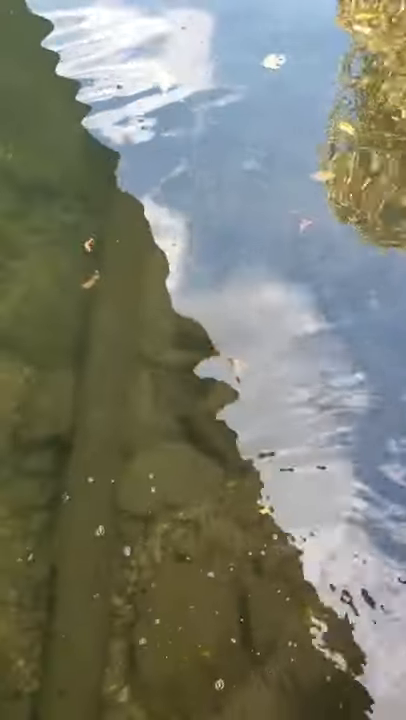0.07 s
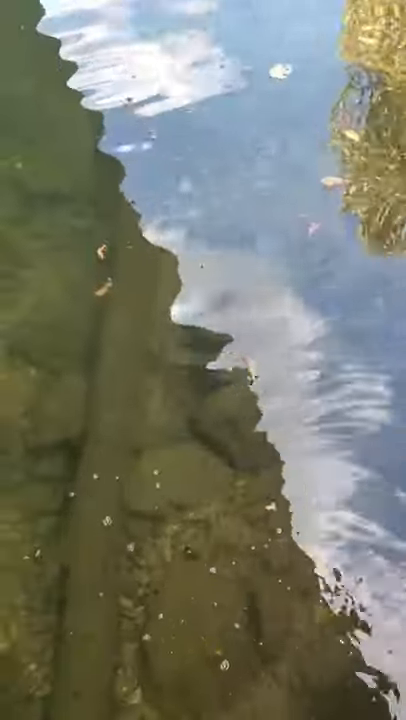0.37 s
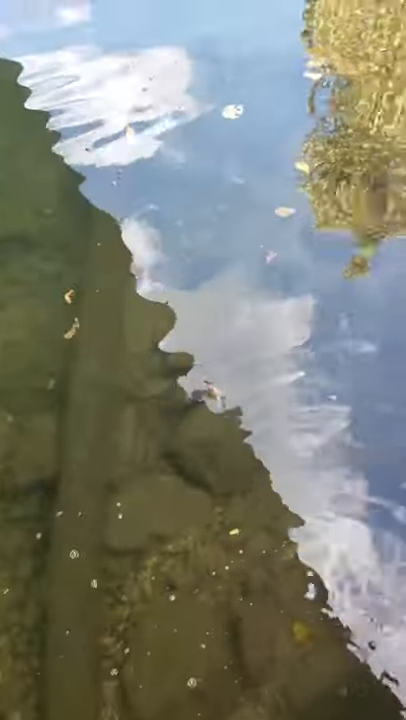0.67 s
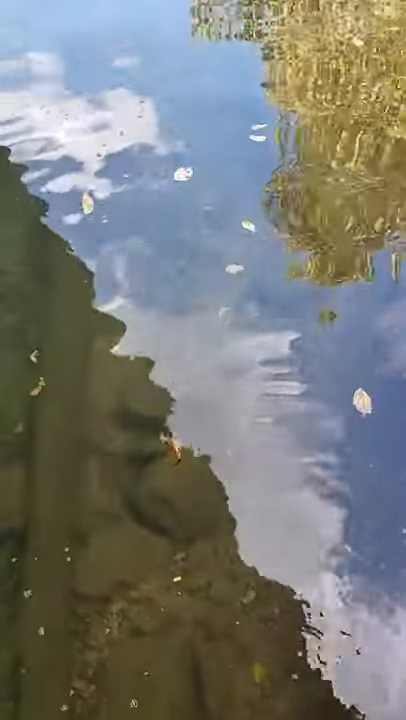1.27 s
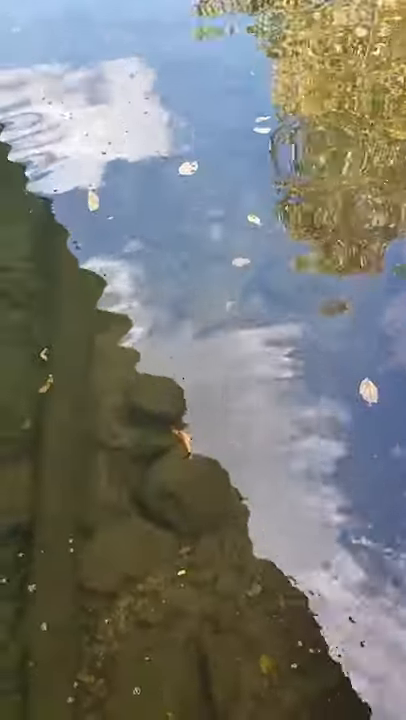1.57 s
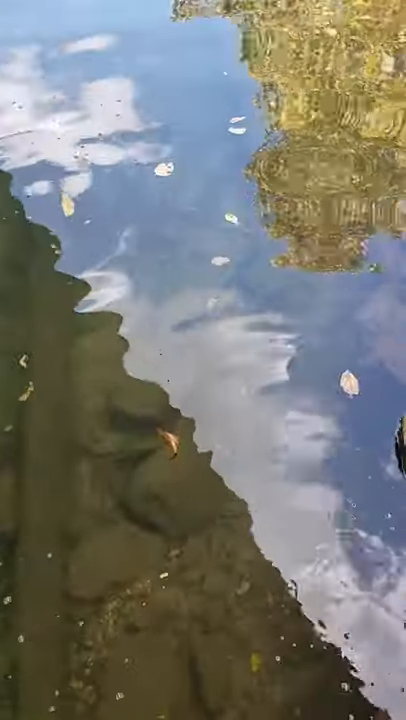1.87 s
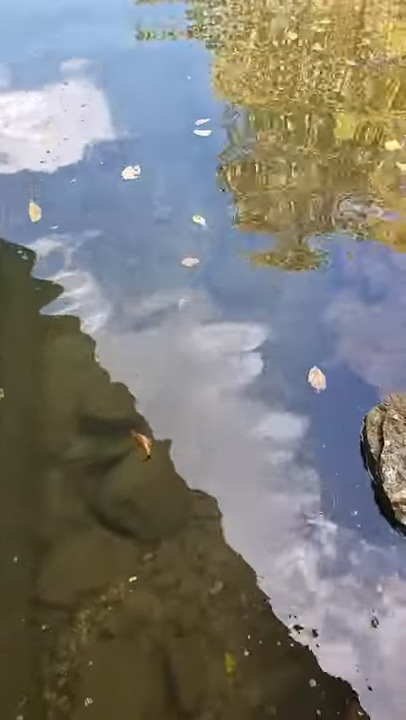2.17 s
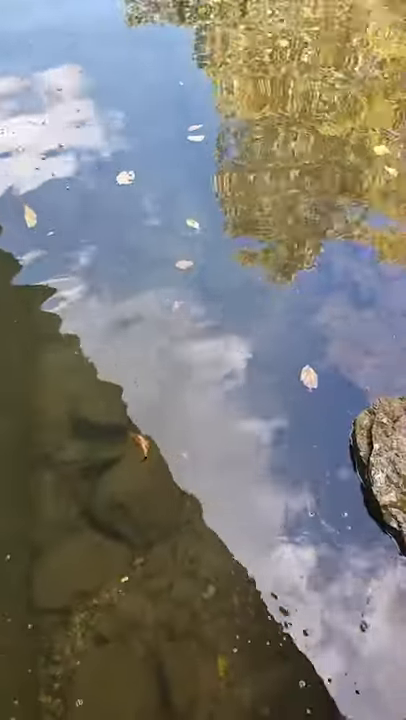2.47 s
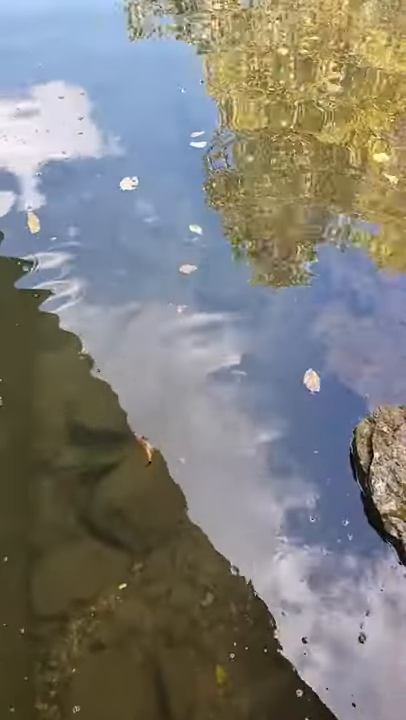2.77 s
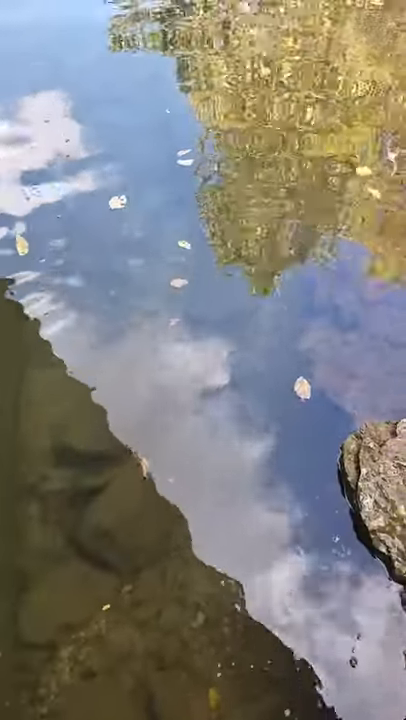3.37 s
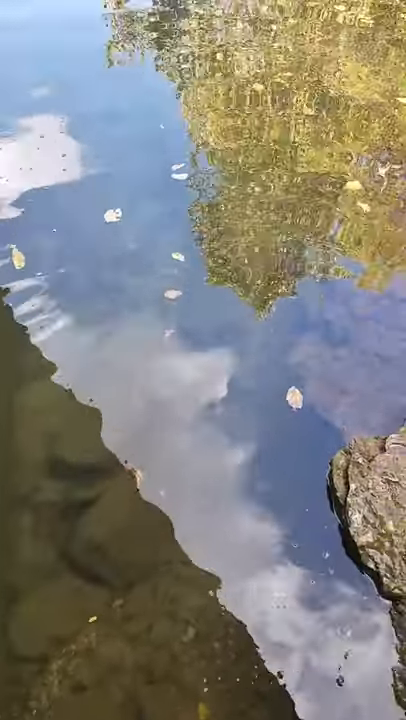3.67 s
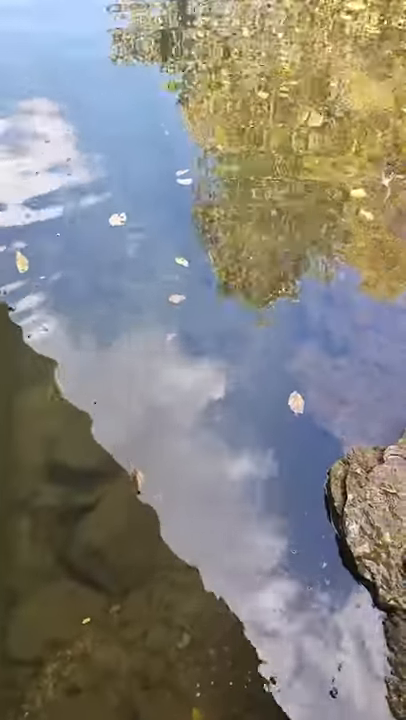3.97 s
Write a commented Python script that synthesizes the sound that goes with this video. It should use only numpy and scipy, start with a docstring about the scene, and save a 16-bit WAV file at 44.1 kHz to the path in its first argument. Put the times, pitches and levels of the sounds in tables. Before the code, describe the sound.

A slow river's low rumble and soft rush, with high insect buzzes and tiny drips.

```python
"""On the bank of a slow river, a warm day, stereo microphone. From the start a low, droning rumble,
like far traffic, lies under a soft rush. Close by on the left, meadow katydids scrape their wings, very
high: a few ticks, then a buzz. A faint cricket pulses below their pitch. In the first second a few tiny
drops plip on the water. The rush swells towards three seconds and ebbs; one more drop falls, and the
rumble sinks under the last ticks."""
import sys
import numpy as np
from scipy import signal
from scipy.fft import rfft, irfft
from scipy.io import wavfile
from scipy.ndimage import uniform_filter1d

SR = 44100
rng = np.random.default_rng(int(sys.argv[2]) if len(sys.argv) > 2 else 0)


def put_to_file(sound):
    """Save the sound as 16-bit audio at rate SR, in the file named by the first command-line argument."""
    columns = np.atleast_2d(sound).T  # one column per channel
    safe = np.clip(columns, -1, 1)
    whole_steps = np.round(safe * 32767)
    wavfile.write(sys.argv[1], SR, whole_steps.astype(np.int16))


N = 176400

# rasp of a katydid's wings, near or far (frequency [Hz], level [dB])
WING_SPECTRUM = [(6500, -64), (8400, -23.5), (9200, -13.5), (10200, -8), (11000, -3), (11700, 1),
                 (12600, -1), (13300, 0), (14000, 1.5), (14800, 0), (15800, -3)]
RUMBLE_PAN_DB, RUMBLE_SPREAD = -2, .11  # narrow, a little to the right


def undb(db):
    """Decibels to gain."""
    return 10 ** (np.asarray(db) / 20)


def unit(x):
    """Scale to rms 1."""
    return x / np.sqrt(np.mean(x ** 2))


def pan(db):
    """Left and right gains, the left louder by db."""
    return undb(np.array([[db], [-db]]) / 2)


def curve(points, t):
    """Gain along (time [s], level [dB]) points."""
    return undb(np.interp(t, *np.array(points).T))


def noise(response, spread=1):
    """Stereo noise of rms 1, shaped by a frequency response; spread 0 is centred, 1 is all around."""
    freqs = np.arange(N // 2 + 1) * SR / N + 1e-6
    mid, side = irfft(rfft(rng.standard_normal((2, N))) * response(freqs), N)
    return unit(mid + spread * side * np.array([[1], [-1]]))


def colour(points):
    """Response through (frequency [Hz], level [dB]) points."""
    hz, db = np.array(points).T
    return lambda f: undb(np.interp(np.log(f), np.log(hz), db))


def resonance(hz, width_hz):
    """Response of a steep resonance."""
    return lambda f: 1 / (1 + ((f - hz) / width_hz * hz / f * (f + hz) / (2 * hz)) ** 2)


def walk(per_s):
    """Smooth random wander of rms 1, with per_s new values a second."""
    hold = int(SR / per_s)
    steps = np.repeat(rng.standard_normal(N // hold + 1), hold)
    return unit(uniform_filter1d(uniform_filter1d(steps, hold), hold)[:N])


def steady(x, window_s=.16):
    """Even out the slow swells of a stereo noise and keep its fast flutter."""
    return x / np.sqrt(uniform_filter1d(np.mean(x ** 2, axis=0), int(window_s * SR)))


def rumble(t, surge_s=.045, dip_s=.035):
    """Far off: a dull roar whose narrow drones grow or fade, with a few low surges and brief dips."""
    # the roar (frequency [Hz], level [dB])
    spectrum = [(12, -7), (29, -42), (46, -8), (62, -17.5), (85, -6.5), (148, -8), (180, 0), (250, 0),
                (290, -9), (335, -6.5), (450, -15.5), (700, -25.5), (1400, -43.5), (3000, -64.5)]
    # its rise and fall (time [s], level [dB])
    levels = [(0, -28), (.25, -26.5), (.55, -25.5), (.75, -27), (1.1, -26), (1.4, -27), (1.65, -26.5),
              (1.92, -29.5), (2.1, -27.5), (2.4, -27), (2.7, -27.5), (3, -28.5), (3.25, -29), (3.6, -28.5),
              (4, -33.5)]
    # drones in it (pitch [Hz], width [Hz], starting level against the roar [dB], drift [dB/s])
    drones = [(102.3, 7.1, -9.5, 0.08), (134.5, 2.5, -11.5, -0.47), (165.8, 11, -8.5, 0.5),
              (211.3, 8.6, -15, 2.5), (238.7, 7.1, -5.5, -4), (362.4, 11.7, -15, 1.68),
              (525.4, 31, -22.5, 2.5), (763, 41, -24.5, 1.5), (1348, 51, -43, 4)]
    # low surges (time [s], level [dB])
    surges = [(.30, -29), (.53, -33), (1.03, -31.5), (1.26, -31), (1.86, -29), (2.08, -36)]
    # brief dips of the roar (time [s], level change [dB])
    dips = [(.43, -3.5), (2.185, -3.5), (3.62, -2.5)]
    roar = noise(colour(spectrum), RUMBLE_SPREAD)
    for hz, width_hz, db, drift in drones:
        roar += undb(db + drift * t) * noise(resonance(hz, width_hz), RUMBLE_SPREAD)
    surge = sum(undb(db) * np.exp(-((t - at) / surge_s) ** 2) for at, db in surges)
    low_band = steady(noise(resonance(hz=100, width_hz=14), RUMBLE_SPREAD))
    dip_db = sum(db * np.exp(-((t - at) / dip_s) ** 2) for at, db in dips)
    return (steady(roar) * curve(levels, t) * undb(dip_db) + surge * low_band) * pan(RUMBLE_PAN_DB)


def rush(t):
    """All around: a soft rush that wavers a little as it swells and ebbs."""
    # the rush (frequency [Hz], level [dB])
    spectrum = [(60, -27), (200, 2), (400, -2), (550, -1.5), (800, -2.5), (1050, -6.5), (1500, -17.5),
                (2000, -25.5), (2650, -33.5), (3300, -37.5), (4500, -47.5), (6200, -60), (9000, -66),
                (16000, -45)]
    # its swell (time [s], level [dB])
    levels = [(0, -39), (.7, -39), (1.5, -38), (2.2, -35), (2.9, -34.5), (3.5, -36), (4, -40)]
    swell = noise(colour(spectrum), spread=.88) * curve(levels, t)
    return swell * undb(.5 * walk(per_s=9.63)) * pan(-3)


def water_hiss():
    """To the right: the fine, steady hiss of the river."""
    # moving water (frequency [Hz], level [dB])
    spectrum = [(500, -28), (1400, 3.5), (2000, 0.5), (2650, -5), (3300, -16.5), (4600, -18), (6300, -27.5),
                (16000, -37)]
    return noise(colour(spectrum)) * undb(-52.5) * pan(-4.5)


def open_air():
    """To the left: the faint, high hiss of the open air."""
    # the air (frequency [Hz], level [dB])
    spectrum = [(2000, 3), (3900, 3.5), (6300, -7), (16000, -4)]
    return noise(colour(spectrum)) * undb(-64) * pan(6.5)


def deep_bass(t):
    """Under the rumble: a deep band that sinks midway and comes back stronger."""
    # its fall and rise (time [s], level [dB])
    levels = [(0, -45), (1.7, -45), (2.2, -54), (3, -50), (4, -40)]
    band = noise(resonance(hz=47.6, width_hz=21), RUMBLE_SPREAD)
    return band * curve(levels, t) * pan(RUMBLE_PAN_DB)


def wing_strokes(cycles, floor, width_cycles=.19, scatter_db=.8):
    """Envelope of a katydid's wing strokes: one scrape a cycle, each of its own strength."""
    nearest = np.round(cycles)
    strength = undb(scatter_db * rng.standard_normal(512))[nearest.astype(int) % 512]
    scrape = np.exp(-.5 * ((cycles - nearest) / width_cycles) ** 2)
    return unit(floor + strength * scrape)


def wing_rasp(hz, lift_db=3, width_hz=1400):
    """Rasp of one katydid's wings, lifted around its own pitch."""
    rasp = colour(WING_SPECTRUM)
    return noise(lambda f: rasp(f) * undb(lift_db * np.exp(-((f - hz) / width_hz) ** 2)))


def katydid_buzzes(t, rise_s=.22, edge_s=.06):
    """Close on the left: fast wing strokes swell into a buzz that stops short."""
    # buzzes (start [s], length [s], stroke rate [Hz], level [dB], left over right [dB],
    # rasp between strokes [0-1], pitch [Hz])
    buzzes = [(-.153, 0.484, 60.5, -44.5, 6.5, 0.6, 13200), (0.695, 0.71, 59.7, -42.5, 8, 0.46, 15100),
              (1.182, 0.4, 59.5, -45, 5, 0.5, 11900), (2.253, 0.46, 59.2, -42.5, 8.5, 0.6, 13700),
              (2.085, 0.686, 61, -44.5, 7.5, 0.6, 14000), (3.206, 0.5, 60, -46.5, 5.5, 1, 12000)]
    out = np.zeros((2, N))
    for start, length, rate, db, pan_db, floor, hz in buzzes:
        age = t - start
        rise = np.interp(age, [0, rise_s], [.22, 1])
        gate = np.clip(np.minimum(age, length - age) / edge_s + .5, 0, 1)
        out += undb(db) * pan(pan_db) * rise * gate * wing_strokes(age * rate, floor) * wing_rasp(hz)
    return out


def katydid_chorus(singers=7, stroke_hz=60):
    """Farther along the bank: katydids, each drifting in pace and strength, blend into a chorus."""
    envelopes = []
    for _ in range(singers):
        rate = stroke_hz * (1 + .073 * walk(per_s=1.9))
        cycles = np.cumsum(rate) / SR + rng.random()
        envelopes.append(wing_strokes(cycles, floor=.32) * undb(.8 * walk(per_s=4)))
    blend = np.sqrt(np.mean(np.square(envelopes), axis=0))  # the singers add in power
    return blend * noise(colour(WING_SPECTRUM)) * undb(-47.5) * pan(5)


def crickets(t, chirp_hz=7, first_chirp_s=.1):
    """One faint cricket chirps, now stronger, now weaker, over the steady trill of distant ones."""
    beat = 1 + np.cos(2 * np.pi * chirp_hz * (t - first_chirp_s) + .5 * walk(per_s=2.9))
    chirps = unit(beat ** 2 * undb(1.2 * walk(per_s=chirp_hz)))
    song = steady(noise(resonance(hz=7370, width_hz=110), spread=.73))
    distant = noise(resonance(hz=7410, width_hz=490))
    return undb(-76) * chirps * song + undb(-72) * distant


def drops(t, attack_s=.0007, ring_s=.0036, splash_s=.003, sag_per_s=7):
    """On the water: each drop splashes just above its pitch and rings briefly, the pitch sagging."""
    # drops (time [s], pitch [Hz], level [dB], left over right [dB], splash against ring [dB])
    plips = [(.04, 2450, -53, -3, -12), (.275, 2670, -55.5, -3, -12), (0.647, 3250, -52, 7, -5),
             (.8475, 2330, -47.5, -11, -16), (0.9858, 2860, -36.3, -1.5, -15),
             (3.6994, 2100, -51, -10, -14)]
    out = np.zeros((2, N))
    for at, hz, db, pan_db, splash_db in plips:
        age = np.maximum(t - at, 0)
        phase = 2 * np.pi * np.cumsum(hz * np.exp(-age * sag_per_s)) / SR
        overtone = undb(-21) * np.sin(1.46 * phase)
        ring = (np.sin(phase) + overtone) * np.exp(-age / ring_s)
        spray = noise(resonance(1.05 * hz, width_hz=220), spread=.46)
        splash = undb(splash_db) * spray * np.exp(-age / splash_s)
        attack = 1 - np.exp(-age / attack_s)
        out += 2 * undb(db) * pan(pan_db) * attack * (ring + splash)
    return out


def katydid_ticks(t, width_s=.0033):
    """Close on the left: single flicks of the wings, in the short runs that lead into a buzz."""
    # ticks (time [s], level [dB])
    ticks = [(.535, -44), (.579, -39.5), (.628, -39), (1.962, -51), (2.008, -44), (2.051, -40),
             (2.097, -35.5), (2.145, -38), (2.194, -38), (3.115, -40), (3.163, -40), (3.211, -40),
             (3.895, -39.5), (3.944, -39), (3.992, -41)]
    flicks = sum(undb(db) * np.exp(-.5 * ((t - at) / width_s) ** 2) for at, db in ticks)
    return flicks * wing_rasp(hz=15000) * pan(5.5)


def scene():
    """Everything that reaches the microphone on the bank."""
    t = np.arange(N) / SR
    bed = rumble(t) + rush(t) + water_hiss() + open_air() + deep_bass(t)
    return bed + katydid_buzzes(t) + katydid_chorus() + crickets(t) + drops(t) + katydid_ticks(t)


def record(dry, top_hz=15700):
    """The recorder cuts the top steeply."""
    return signal.sosfilt(signal.ellip(10, .1, 80, top_hz, fs=SR, output="sos"), dry)


dry = scene()
out = record(dry)
put_to_file(out)
```